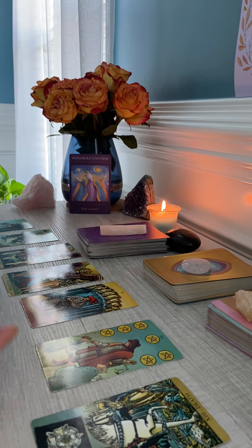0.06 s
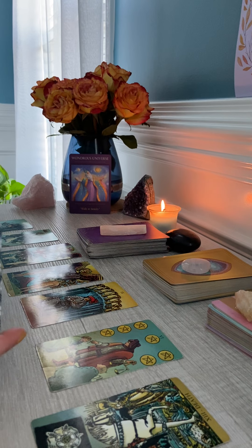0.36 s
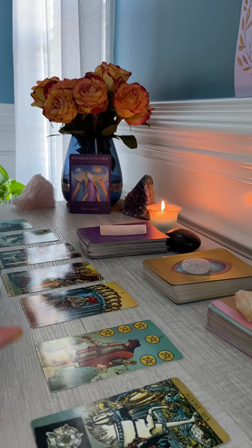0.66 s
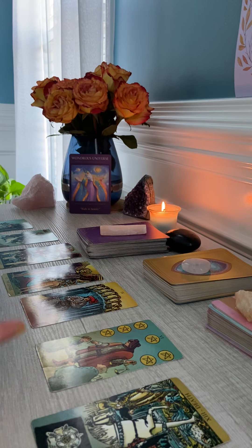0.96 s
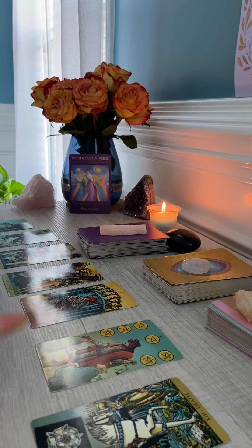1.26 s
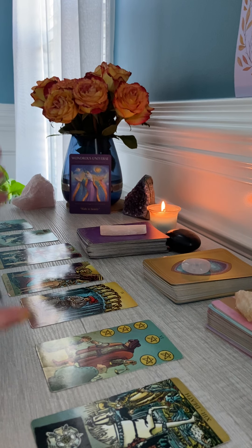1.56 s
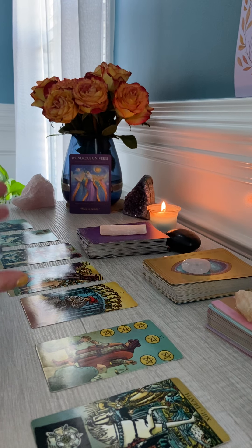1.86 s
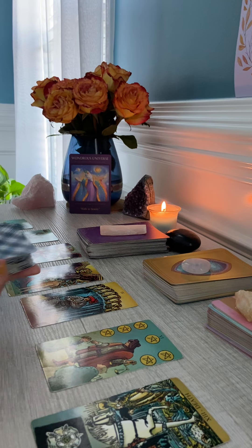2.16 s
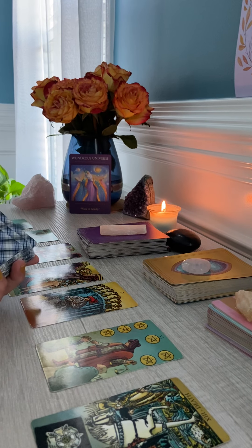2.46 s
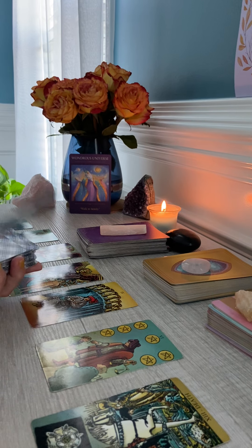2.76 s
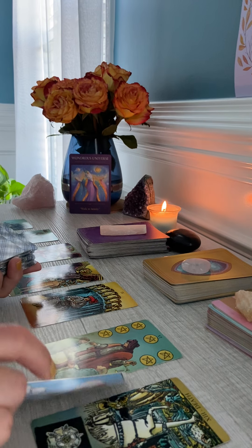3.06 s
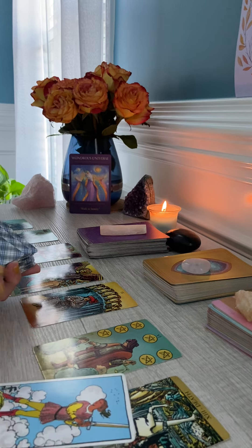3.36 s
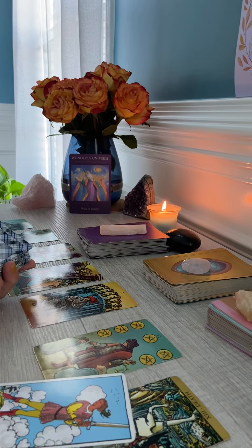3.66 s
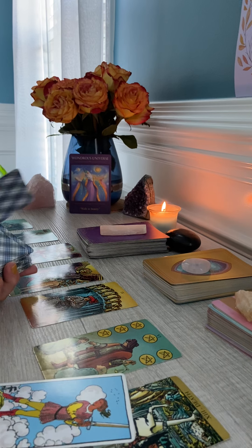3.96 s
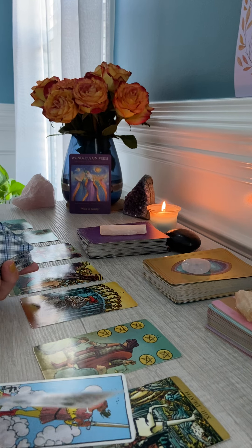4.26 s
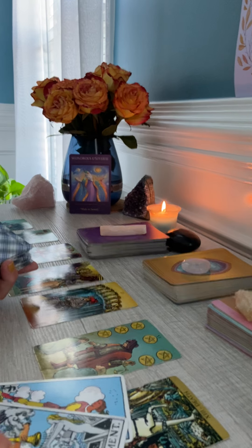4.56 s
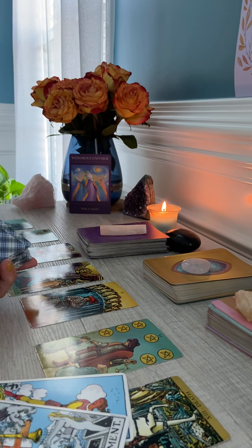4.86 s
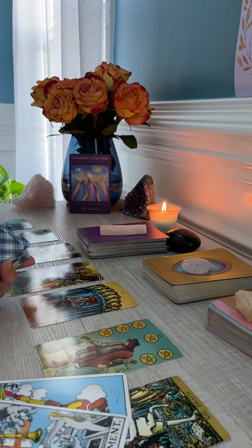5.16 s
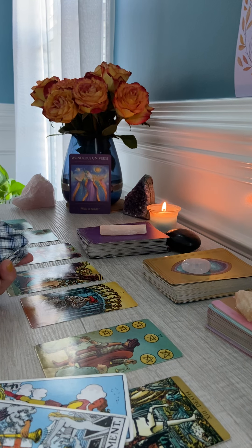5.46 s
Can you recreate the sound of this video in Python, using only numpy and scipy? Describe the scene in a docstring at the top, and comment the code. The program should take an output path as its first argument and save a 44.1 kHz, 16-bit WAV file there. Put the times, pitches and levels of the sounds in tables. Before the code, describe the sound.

Close, light rustling and tapping of a card shuffle, followed by two cards laid down with sharp snaps.

```python
"""Tarot cards are shuffled overhand and laid out on a table, close to a two-port microphone.
Sliding friction makes each packet hiss; its edge ticks on impact and its face flaps onto an air cushion.
Two cards go down with a sharp snap as a bent corner is released, and the last glides to rest.
The quiet room reverberates, and a faint low hum lies underneath."""
import sys
import numpy as np
from scipy import signal
from scipy.fft import rfft, irfft, next_fast_len
from scipy.io import wavfile

SR = 44100
rng = np.random.default_rng(int(sys.argv[2]) if len(sys.argv) > 2 else 0)


def waveform_to_disk(signal):
    """Save audio, clipped to [-1, 1], as 16-bit WAV at the path in sys.argv[1]."""
    frames = np.transpose(np.atleast_2d(signal))
    scaled = np.clip(frames, -1, 1) * 32767
    samples = np.round(scaled).astype(np.int16)
    wavfile.write(sys.argv[1], SR, samples)


N = 252693
TIME = np.arange(N) / SR
BRIEF = TIME[:8192]   # time axis of one impact
TYPICAL_DB = -41.5   # an ordinary contact

# Cards land edge first, then flat. Each row: start in seconds, knock in dB, brightness in dB,
# flap in dB, final flap pitch in Hz.
LANDINGS = [(0.044, -40.5, -5, -40, 97.6), (0.277, -41, 3.5, -46.5, 113), (0.383, -33, -4.5, -42.5, 97),
            (0.706, -42, 0, -38.5, 55.6), (0.91, -51.5, 11, -46.5, 74), (1.054, -40, -3, -41, 85),
            (1.211, -42, 6.5, -45, 112), (1.243, -39, -3, -39, 81), (1.323, -31.5, -2.5, -39.5, 81.5),
            (1.547, -37.5, -0.5, -37, 70.6), (1.643, -35, -4, -38.5, 120.4),
            (1.689, -48.5, -5, -43.5, 68.6), (1.872, -33, 6, -39, 56), (1.942, -45, 9, -50, 61.4),
            (2.536, -46, -1, -53.5, 133.5), (2.787, -58, -1, -45, 70.04), (2.985, -34, -7, -42.5, 100),
            (3.254, -33, -2, -28.5, 130), (3.986, -35, -5.5, -49, 100), (4.501, -27.5, -14.5, -31, 130),
            (4.564, -42.5, -1.5, -35, 109), (4.635, -35, -13.5, -25.5, 140)]
# Spectrum of a card contact. Each row: frequency in Hz, spectral level in dB.
CONTACT_SPECTRUM = [(150, -0.5), (300, 3), (700, 2), (1400, 2.5), (2400, 0.5), (3500, -7), (5500, 2.5),
                    (8000, -15.5), (15500, -20)]
# Sound that the ports do not share, for the direct and the diffuse field.
# Each row: frequency in Hz, level relative to the shared sound in dB.
DIRECT_SIDE = [(100, -25), (500, -17.5), (1200, -10.5), (2800, -9.5), (5000, -14), (7300, -31.5),
               (15000, -16)]
ROOM_SIDE = [(100, -20.5), (400, -5), (1000, 2.5), (1800, -11), (3000, -4), (5500, -7), (7300, -25),
             (15000, -10.5)]


def shuffle_strokes(drag_hiss_db=2, drag_swell_db=-9.5, pull_s=.058, pull_swell_db=13):
    """Friction noise grows with speed: a packet drags lightly, then speeds up as it comes free."""
    # Packets drawn off the deck. Each row: start in seconds, length in seconds, drag in dB, pull in dB,
    # hiss of the pull over its scrape in dB.
    packets = [(0.0, 0.0374, -55, -62.5, 0), (0.198, 0.17, -61.5, -52.5, 6.5), (0.559, 0.14, -62, -49, 3.5),
               (0.885, 0.15, -61, -57.5, 9.5), (1.17, .153, -59.5, -61, 5.5), (1.543, 0.11, -62, -58, 2.5),
               (1.836, 0.11, -55, -51, 1.5)]
    strokes = []
    for grab, length, drag_db, pull_db, hiss_db in packets:
        pull_length = min(pull_s, length)
        strokes.append((grab, length, drag_db, drag_hiss_db, drag_swell_db))
        strokes.append((grab + length - pull_length, pull_length, pull_db, hiss_db, pull_swell_db))
    return strokes


def slides(grip_s=0.01, release_s=0.0029, scrape_hz=2000, hiss_db_per_octave=14, focus_db=4.5):
    """Stick-slip friction: the grain catches and slips; the free length of card colours each stroke."""
    # Single cards pushed, drawn or straightened. Each row: start in seconds, length in seconds,
    # scrape in dB, hiss over scrape in dB, swell across the stroke in dB.
    single_strokes = [(0.82, 0.022, -75, 13.5, 5), (1.215, 0.04, -56, 0, 16), (1.537, 0.022, -39, -6, -4),
                      (1.868, 0.018, -43, 5.5, -16), (2.055, 0.089, -53, 4.5, -2),
                      (2.295, 0.16, -87, 17, 0), (2.52, 0.04, -64.5, 4, -4), (2.65, 0.026, -53.5, 4, 0),
                      (2.675, 0.11, -60.5, -1.5, 18), (3.065, .1, -57, -18.5, 0.5),
                      (3.19, 0.066, -56, -3.5, 6), (3.76, 0.14, -69, 5.5, 8), (3.9, 0.038, -56.5, 3, -9),
                      (3.94, 0.024, -61.5, -6, 23.5), (3.966, 0.0304, -43, -5.5, 1.5),
                      (4.09, 0.075, -72, -14, -6), (4.57, 0.07, -61.5, 5, 3), (5.17, 0.073, -80.5, 10, -4),
                      (5.34, 0.072, -76.5, 4, 13), (5.46, 0.044, -74.5, 9.5, 1), (5.68, 0.043, -82, 3, 12)]
    # The low and high parts of the friction noise. Each row: frequency in Hz, spectral level in dB.
    scrape_spectrum = [(250, -0.5), (600, 2.5), (1200, -2.5), (2300, -4.5), (3500, -7.5), (5000, -7),
                       (8000, -32)]
    hiss_spectrum = [(1500, -25), (3000, -9.5), (4500, 2.5), (6500, 1), (9000, 0), (12000, -5),
                     (15500, -8.5)]
    out, t = np.zeros((2, N)), TIME[:16384]
    for start, length, scrape_db, hiss_db, swell_db in shuffle_strokes() + list(single_strokes):
        pressure = (1 - np.exp(-t / grip_s)) * np.exp(-np.maximum(t - length, 0) / release_s)
        pressure *= from_db(swell_db * (np.minimum(t / length, 1) - .5))
        grain = rms_one(snags(t) * from_db(1.9 * flutter(600, t) + 1.2 * flutter(73, t)))
        centre_hz = scrape_hz * 2 ** (hiss_db / hiss_db_per_octave)   # hissier strokes scrape higher
        colour = [(hz, db - focus_db * np.log2(hz / centre_hz) ** 2 / 2) for hz, db in scrape_spectrum]
        scrape_gain = from_db(scrape_db + 0.4 * flutter(130, t))
        scrape = scrape_gain * noise(colour, DIRECT_SIDE, len(t), ripple_db=6.5)
        hiss = from_db(scrape_db + hiss_db) * noise(hiss_spectrum, DIRECT_SIDE, len(t))
        add(out, start, pressure * grain * (scrape + hiss))
    return out


def snags(t, per_s=70, strength=.9, decay_s=0.00071):
    """A Poisson process: neighbouring edges snag at random and briefly raise the friction."""
    kicks = (rng.random(len(t)) < per_s / SR) * np.minimum(rng.exponential(1, len(t)), 2)
    return 1 + strength * signal.lfilter([1], [1, -np.exp(-1 / (decay_s * SR))], kicks + 1e-18)


def edge_ticks(contact_s=.0014, lead_s=0.00084, crisp_db_per_db=0.407):
    """Impact noise: an edge strikes as a cluster of tiny collisions, and the low band rings longest."""
    # An edge meets the deck or table. Each row: start in seconds, knock in dB, brightness in dB.
    touches = [(0.003, -48, 4.5), (0.098, -53.5, -10), (0.118, -55, -17), (0.201, -50, -1.5),
               (0.309, -42, 1.5), (0.346, -44, 7.5), (0.585, -50.5, 5), (0.602, -51.5, -20),
               (0.639, -44.5, 2), (0.901, -54, 5), (0.924, -54, -9), (0.997, -46.5, 10.5),
               (1.045, -37.5, -8.5), (1.412, -51, -17), (1.537, -38.5, 4), (1.555, -41.5, 3),
               (1.85, -39.5, 3.5), (2.094, -56, 0), (2.127, -64, 11), (2.134, -57, -7), (2.284, -66.5, 1.5),
               (2.665, -52.5, 9), (3.169, -46.5, -16.5), (3.215, -46, -6.5), (3.995, -41.5, -11.5),
               (4.382, -45, -4.5), (4.403, -49.5, -5), (4.494, -37, -20), (5.045, -66, -1.5),
               (5.495, -60.5, -2.5)]
    out = np.zeros((2, N))
    press = (1 - np.exp(-BRIEF / contact_s)) ** 3
    for start, knock_db, brightness_db, *_ in list(touches) + list(LANDINGS):
        click_db = knock_db + brightness_db
        # Lighter contacts catch only the very edge and sound crisper.
        crack_db = click_db + crisp_db_per_db * (TYPICAL_DB - knock_db)
        grit = press * noise(CONTACT_SPECTRUM, DIRECT_SIDE, len(BRIEF))
        knock = band(band(grit * np.exp(-BRIEF / (2.1 * contact_s)), 200, 1900), 180, 2800)
        click = band(grit * np.exp(-BRIEF / (1.2 * contact_s)), 1400, 4600)
        crack = band(grit * np.exp(-BRIEF / (0.84 * contact_s)), 5300, .45 * SR)
        tick = impact(knock, knock_db + 1) + impact(click, click_db + 3) + impact(crack, crack_db - 2)
        add(out, start - lead_s, tick)
    return out


def flaps(cushion_s=0.022, halving_db=15.5, rise_s=0.0024, face_lag_s=.0028, roughness=0.32):
    """Air cushioning: a card settles with an uneven flutter that sinks into a soft thump."""
    out = np.zeros((2, N))
    for start, _, _, level_db, end_hz in LANDINGS:
        # A harder landing squeezes the air out sooner.
        decay_s = cushion_s * 2 ** ((TYPICAL_DB - level_db) / halving_db)
        envelope = (1 - np.exp(-BRIEF / rise_s)) / (1 + (BRIEF / decay_s) ** 3)
        air = rms_one(band(noise(CONTACT_SPECTRUM, DIRECT_SIDE, len(BRIEF)), 25, 310))
        thump = bending_wave(900, end_hz, fall_s=.0023, wobble=0.22)
        add(out, start + face_lag_s, from_db(level_db) * envelope * (thump + roughness * air))
    return signal.sosfilt(signal.butter(3, 10, "high", fs=SR, output="sos"), out)


def corner_snaps(slap_lag_s=0.00055):
    """Elastic release: a bent corner cracks on the table, and the face of the card slaps after it."""
    # Strikes and rebounds. Each row: start in seconds, crack in dB, crack decay in seconds, slap in dB,
    # nominal slap pitch in Hz, time scale of the pitch fall in seconds.
    strikes = [(3.2533, -15.5, 0.0025, -23.5, 1440, 0.012), (3.2555, -24.5, 0.0014, -24.5, 797, 0.0037),
               (3.2593, -15, 0.001, -27, 342, 0.0048), (4.6353, -18.5, 0.0016, -19.5, 1430, 0.0049),
               (4.6377, -17.5, 0.0018, -27.5, 801, 0.0055)]
    # The crack of a corner. Each row: frequency in Hz, spectral level in dB.
    crack_spectrum = [(400, -3), (1400, -3), (2400, -6.5), (3600, -0.5), (5000, 0.5), (6500, 5), (8500, 3),
                      (11000, -3.5), (15500, -3)]
    out = np.zeros((2, N))
    for start, crack_db, decay_s, slap_db, slap_hz, fall_s in strikes:
        crack = noise(crack_spectrum, DIRECT_SIDE, len(BRIEF)) * fade(decay_s, rise_s=0.0019)
        slap = bending_wave(1.2 * slap_hz, .3 * slap_hz, fall_s) * fade(0.0018, rise_s=0.0005)
        add(out, start, impact(crack, crack_db))
        add(out, start + slap_lag_s, impact(band(slap, 130, 2800), slap_db))
    return out


def bending_wave(start_hz, end_hz, fall_s, wobble=0):
    """Dispersion: high bending waves run fastest, so the pitch drops within milliseconds."""
    hz = end_hz + (start_hz - end_hz) / (1 + BRIEF / fall_s) ** 2
    hz *= np.exp(wobble * flutter(450, BRIEF))
    return np.sin(2 * np.pi * np.cumsum(hz) / SR)


def glide():
    """Sliding friction: the last card skims the table with a narrow whisper that fades as it slows."""
    # Envelope of the glide. Each row: time in seconds, level in dB.
    envelope = [(4.64, -88), (4.679, -46), (4.78, -57), (4.901, -73.5), (5.059, -79), (5.18, -85)]
    # Card rubbing on the table top. Each row: frequency in Hz, spectral level in dB.
    whisper_spectrum = [(900, -25), (1350, -5.5), (1600, 2), (1900, -1.5), (2250, -15.5), (3000, -35.5)]
    times, level_db = np.transpose(envelope)
    skimming = (TIME > times[0]) & (TIME < times[-1])
    return skimming * from_db(np.interp(TIME, times, level_db)) * noise(whisper_spectrum, DIRECT_SIDE, N)


def reverberation(x, build_s=0.0013, bands=17):
    """A diffuse field: each band stores the energy it is fed and loses it at its own exponential rate."""
    # Room response. Each row: frequency in Hz, gain in dB, reverberation time in seconds.
    response = [(66.96, 4.5, 0.55), (247, 0.5, 0.16), (500, 3, .42), (950, -7, 0.51), (1660, -2.5, 0.62),
                (2580, 2.5, 0.31), (4500, -1.5, 0.56), (8000, -4, 0.44), (15000, 1, 0.16)]
    decay_times = [(hz, t60) for hz, _, t60 in response]
    size, out = next_fast_len(N), 0
    edges = np.geomspace(60, 16500, bands + 1)
    white = [(20, 0), (20000, 0)]
    wash = [noise(white, ROOM_SIDE, size, ripple_db=3.1, spacing_hz=50)[:, :N] for _ in range(2)]
    for k, (low, high) in enumerate(zip(edges, edges[1:])):
        hz = np.sqrt(low * high)
        t60 = at_hz(decay_times, hz)
        energy = band(x.mean(axis=0) + 1e-9 * wash[0][0], low, high) ** 2
        for retained in (from_db(-120 / (t60 * SR)), np.exp(-1 / (build_s * SR))):   # decay, build-up
            energy = signal.lfilter([1 - retained], [1, -retained], energy)
        carrier = rms_one(band(wash[k % 2], low, high))
        out = out + from_db(at_hz(response, hz)) * np.sqrt(energy) * carrier
    return out


def room_tone(noise_db=-67.5, hum_db=-65.5, hum_hz=59.5):
    """Ambient noise: a steady low rush and a hum with slow, slight phase modulation."""
    # The quiet room. Each row: frequency in Hz, spectral level in dB.
    ambient_spectrum = [(15, -42), (25, -26), (40, -9), (56, -2.5), (80, -5), (105, -4.5), (160, -17.5),
                        (300, -17), (600, -27.5), (1200, -32.5), (5000, -40), (10000, -39), (16000, -47.5)]
    rush = noise(ambient_spectrum, ROOM_SIDE, N)
    hum = rms_one(np.sin(2 * np.pi * hum_hz * TIME + .5 * flutter(1.8, TIME)))
    return from_db(noise_db) * rush + from_db(hum_db) * hum


def microphone_ports(direct, diffuse):
    """Path difference shifts the treble phase between the ports; direct sound also differs in level."""
    # Phase difference. Each row: frequency in Hz, lead of the left port in radians.
    phase_lead = [(0, 0), (1600, 0), (2700, .65), (4400, .6), (5200, .35), (7300, 3.14), (10300, 6.2),
                  (13600, 9.4), (16000, 11.7)]
    # Level difference. Each row: frequency in Hz, left minus right in dB.
    balance = [(100, -3.5), (600, 0.5), (1100, 3), (1900, 0), (2800, -1), (4400, -2.5), (5600, 0),
               (15000, 1)]
    size = next_fast_len(N + 2048)
    hz = np.arange(size // 2 + 1) * SR / size
    sides = np.array([[.5], [-.5]])
    spectrum = rfft(direct, size) * from_db(sides * at_hz(balance, hz)) + rfft(diffuse, size)
    phase = sides * np.interp(hz, *np.transpose(phase_lead))
    return irfft(spectrum * np.exp(1j * phase), size)[:, :N]


def noise(colour, unshared, size, ripple_db=0, spacing_hz=130):
    """Partly coherent stereo noise at unit rms; a spectral ripple stands for many small resonances."""
    hz = np.arange(size // 2 + 1) * SR / size
    mid, side = np.exp(2j * np.pi * rng.random((2, len(hz))))
    width = from_db(at_hz(unshared, hz))
    pair = (mid + width * side * [[1], [-1]]) / np.sqrt(1 + width ** 2)
    ripple = ripple_db * np.clip(flutter(1 / spacing_hz, hz), -2, 2) * hz / (hz + 700)
    return rms_one(irfft(pair * from_db(at_hz(colour, hz) + ripple), size))


def flutter(rate, along):
    """Random modulation along time or frequency, at unit rms."""
    return rms_one(np.interp(along * rate, np.arange(len(along)), rng.standard_normal(len(along))))


def impact(x, level_db):
    """Give a transient the energy of 4 ms of steady sound at this level."""
    energy = np.mean(np.sum(x ** 2, axis=-1))
    return from_db(level_db) * x / np.sqrt(energy / (.004 * SR) + 1e-20)


def fade(decay_s, rise_s):
    """Quick rise, exponential decay."""
    return (1 - np.exp(-BRIEF / rise_s)) * np.exp(-BRIEF / decay_s)


def band(x, low_hz, high_hz):
    """Causal band-pass."""
    return signal.sosfilt(signal.butter(2, [low_hz, high_hz], "band", fs=SR, output="sos"), x)


def from_db(db):
    """Decibels to amplitude ratio."""
    return 10 ** (np.asarray(db) / 20)


def rms_one(x):
    """Scale to unit rms."""
    return x / np.sqrt(np.mean(x ** 2) + 1e-20)


def at_hz(points, hz):
    """Interpolate on a log-frequency axis."""
    points = np.array(points)
    return np.interp(np.log(np.maximum(hz, 1)), np.log(points[:, 0]), points[:, 1])


def add(out, start_s, sound):
    """Superpose a sound from start_s on."""
    start = max(0, round(start_s * SR))
    out[:, start:start + sound.shape[-1]] += sound[..., :N - start]


def scene():
    """Superposition: the direct sound of the cards and the diffuse field meet at the microphone."""
    deck, snaps, thumps = edge_ticks() + slides(), corner_snaps(), flaps()
    room_feed = from_db(-7) * deck + from_db(-6) * snaps + from_db(-11) * thumps
    diffuse = reverberation(room_feed) + room_tone()
    return microphone_ports(deck + snaps + thumps + glide(), diffuse)


def record(dry):
    """Band limiting: a steep low-pass removes the treble above 16.3 kHz."""
    return signal.sosfilt(signal.ellip(10, .1, 80, 16300, fs=SR, output="sos"), dry)


dry = scene()
out = record(dry)
waveform_to_disk(out)
```